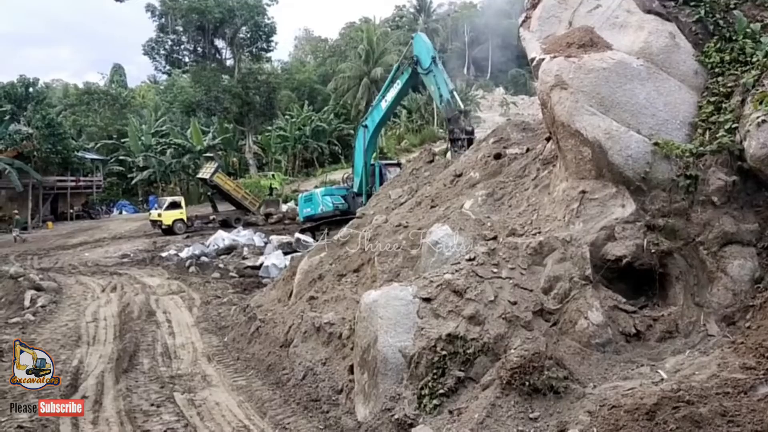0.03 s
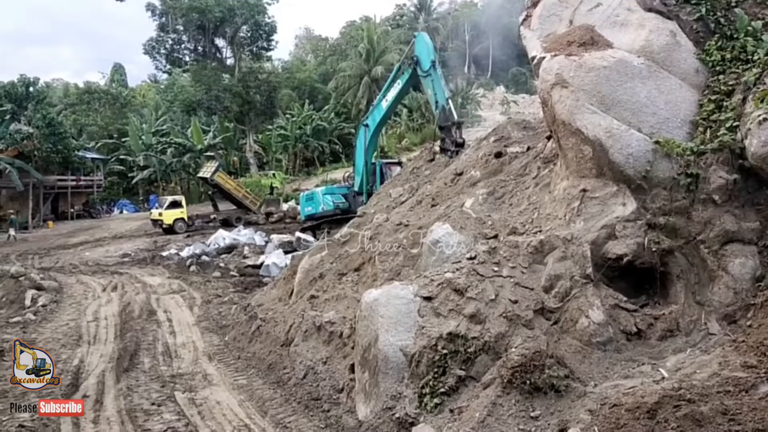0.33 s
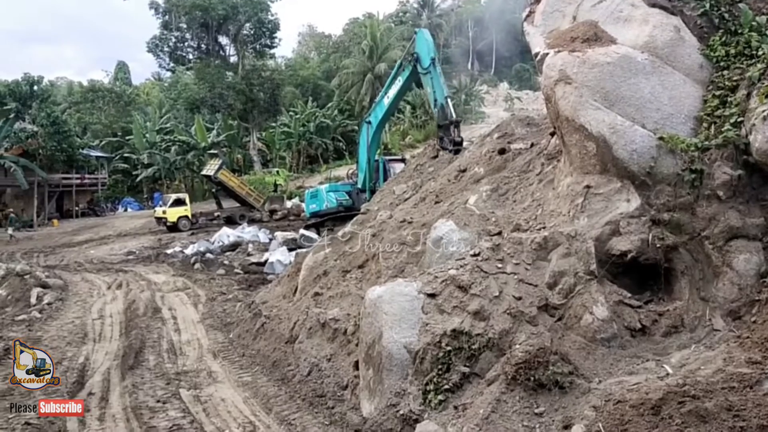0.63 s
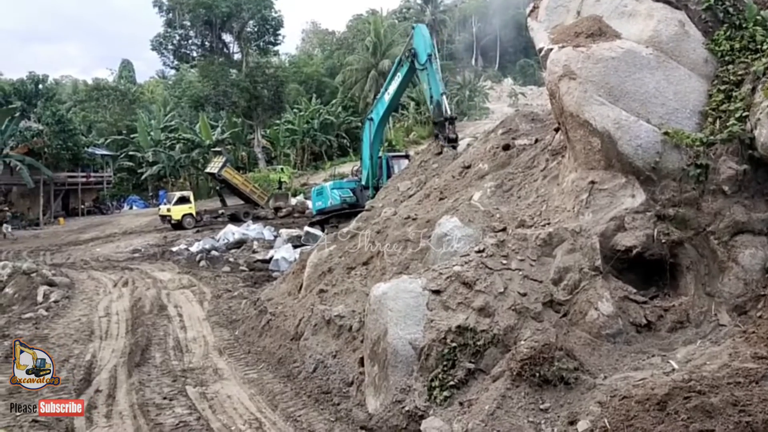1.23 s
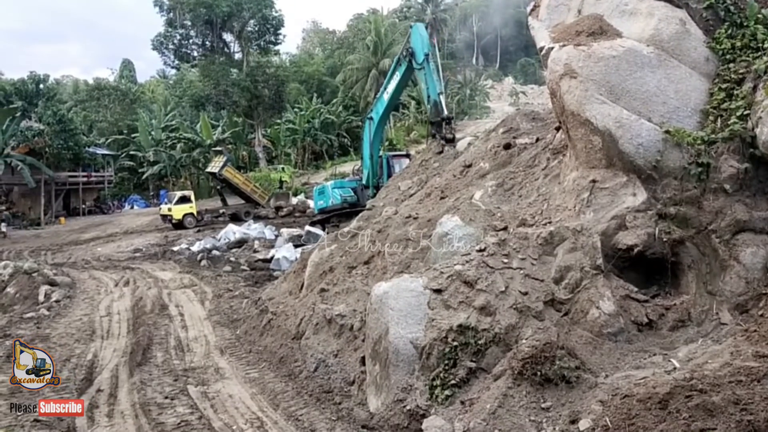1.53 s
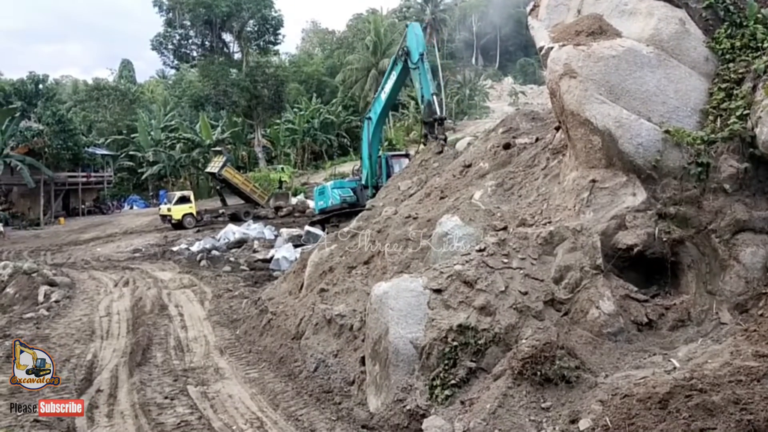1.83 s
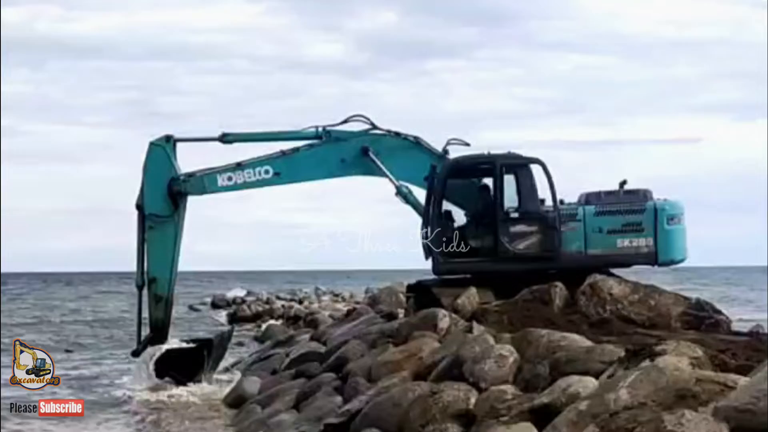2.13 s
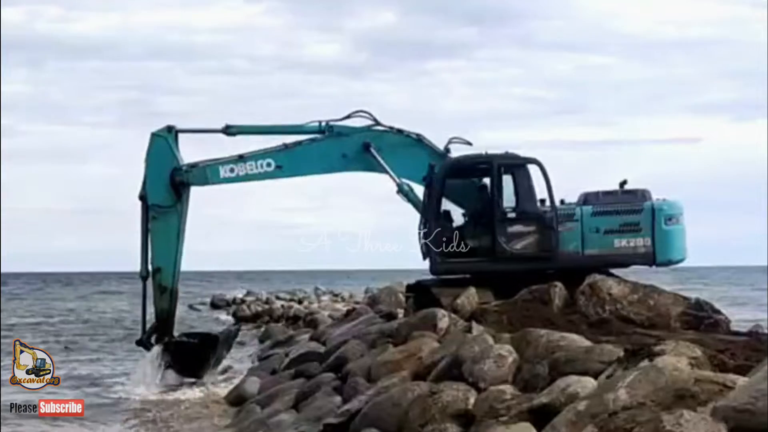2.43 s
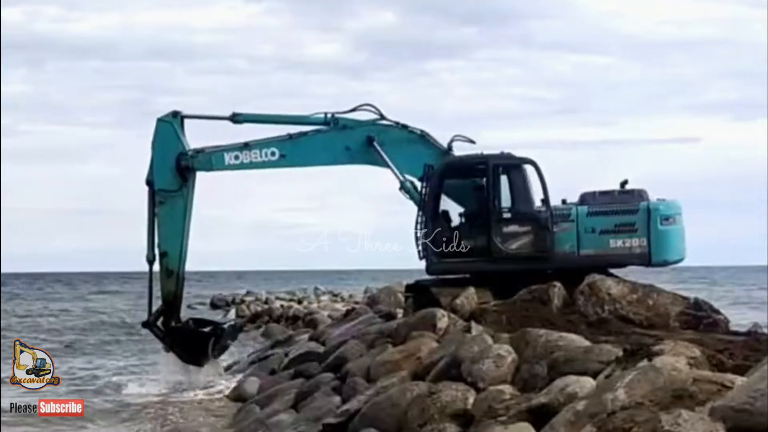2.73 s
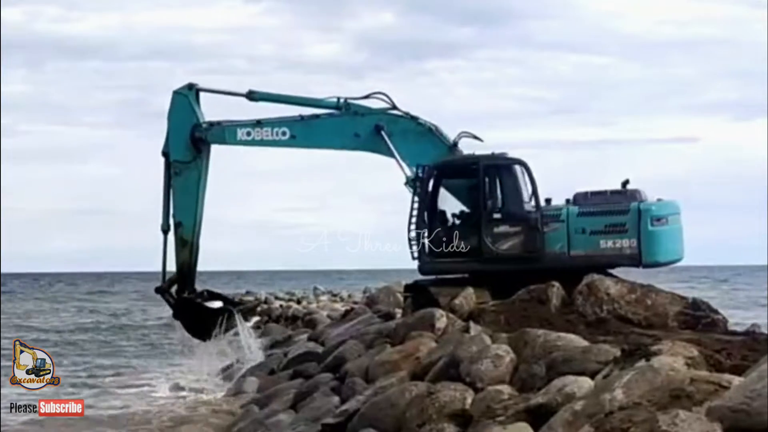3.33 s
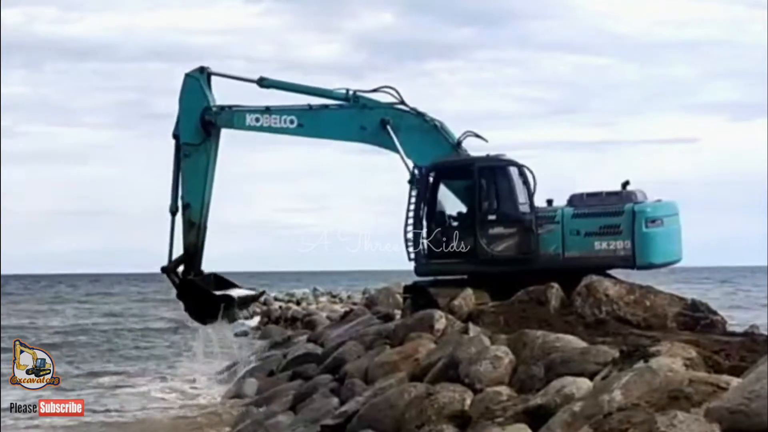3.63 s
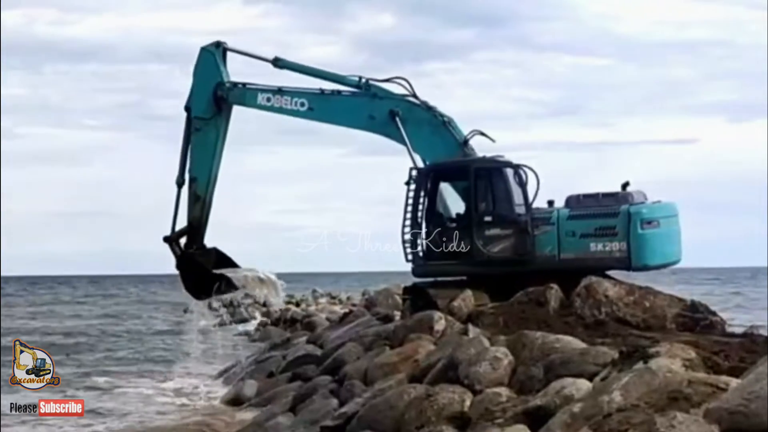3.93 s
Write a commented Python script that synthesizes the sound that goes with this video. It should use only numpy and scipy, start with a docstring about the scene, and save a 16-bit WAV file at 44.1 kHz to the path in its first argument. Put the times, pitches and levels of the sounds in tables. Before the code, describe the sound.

An excavator's steel bucket scrapes and knocks through rock across a quarry, its diesel running, ending on a heavy clang. After a brief silence, wind buffets the microphone by the sea as a wave washes over stones.

```python
"""Excavators in a quarry and on a sea wall

From across a quarry, a diesel runs while its steel bucket scrapes and knocks through rock, ringing
with each blow and ending on one heavy clang. After a short silence we stand at a sea wall, a second
machine murmuring far off: wind buffets the microphone, a wave washes over the stones and water
spills from the bucket."""
import sys
import numpy as np
from scipy import signal
from scipy.fft import rfft, irfft
from scipy.io import wavfile

SR = 44100
rng = np.random.default_rng(int(sys.argv[2]) if len(sys.argv) > 2 else 0)


def to_wav(s):
    """Save 16-bit WAV."""
    ch = np.atleast_2d(s).T  # columns
    pcm = np.round(np.clip(ch, -1, 1) * 32767)  # PCM
    wavfile.write(sys.argv[1], SR, pcm.astype(np.int16))


N = 176400
T, HZ = np.arange(N) / SR, np.fft.rfftfreq(N, 1 / SR)

# modes of the steel bucket and arm (frequency [Hz], relative level [dB], time to fall 60 dB [s])
BUCKET_MODES = [(133, 5.5, 0.13), (190.4, -2.5, 0.33), (233.7, -1.5, 0.54), (405.2, -4.5, 0.81),
                (489.7, -8.5, 0.9), (553.5, 0.5, .43), (713, -14, 0.47), (765, 1, .3), (845, 0, 0.5),
                (1068, 0, 0.3), (1222, -2.5, 0.25), (1398, -14, 1), (2660, -19.5, .35)]
# bucket against rock (time [s], relative level [dB], tone centre [Hz], half-width [octaves])
BLOWS = [(0.084, -30, 220, .6), (0.183, -37.5, 430, 0.38), (.286, -25, 1050, 1.3), (0.379, -34.5, 520, 1),
         (.461, -34.5, 850, .8), (.747, -30, 800, 0.99), (.76, -23.5, 1150, 0.55), (.797, -26.5, 750, 1.4),
         (0.82, -25.5, 1100, 1.7), (0.857, -27.5, 700, 2), (1.04, -46, 4400, 0.086),
         (1.057, -38.5, 1350, 0.36), (1.118, -35, 1100, 0.92), (1.333, -42, 520, 0.57),
         (1.543, -23.5, 119.7, 0.62), (1.533, -25, 700, 0.84), (1.565, -25, 490, .3),
         (1.733, -32.5, 450, 1.1), (1.866, -25, 550, 1.5), (1.917, -25, 330, 1), (2.063, -15, 240, .9)]
# rock being crushed (frequency [Hz], relative level [dB])
CRUNCH_TONE = [(40, -22.5), (200, 2.5), (290, -10.5), (450, -0.5), (880, 1.5), (1400, -3), (2500, -14),
               (16000, -29)]
# teeth bouncing on a boulder (time [s], level [dB])
BOULDER_BOUNCES = [(2.06, -20), (2.0665, -11), (2.077, -8), (2.088, -13.5), (2.1, -12.5)]
# bucket dragged through the ground (time [s], level [dB])
GRIND_LEVEL = [(0, -47), (.1, -38.5), (.35, -38.5), (.73, -44.5), (.88, -34.5), (.97, -41.5), (1.15, -40),
               (1.25, -46.5), (1.47, -47.5), (1.55, -29.5), (1.9, -32), (1.99, -36), (2.2, -33.5)]
# teeth grinding stones (frequency [Hz], relative level [dB])
GRIND_TONE = [(40, -44.5), (180, 0.5), (240, -11.5), (450, 2), (640, -5.5), (900, -1.5), (1600, -14.5),
              (2700, -20), (9000, -46)]
# sliding gravel (time [s], relative level [dB])
GRAVEL_LEVEL = [(0, -54.5), (.1, -49), (.75, -50), (.83, -43.5), (.96, -50.5), (1.13, -50), (1.25, -52),
                (1.49, -53.5), (1.56, -39.5), (1.64, -45), (1.78, -47.5), (1.87, -36), (2.03, -52),
                (2.065, -34.5), (2.2, -48)]
# gravel's rattle (frequency [Hz], relative level [dB])
RATTLE_TONE = [(300, -22.5), (1200, 4.5), (2650, 3), (3900, -4.5), (5800, -12), (7000, -6), (8500, -23),
               (16000, -27.5)]
# steel juddering over stone (start [s], stop [s], pitch [Hz], level [dB])
JUDDER_NOTES = [(0.22, 0.67, 860, -44.5), (0.292, 0.74, 1200, -45.5), (1.71, 1.982, 429.4, -33.5)]
# a hydraulic valve's squeal (frequency [Hz], relative level [dB])
SQUEAL_TONES = [(4330, 2), (9050, -4)]
# the squeal's two flares (time [s], relative level [dB])
SQUEAL_LEVEL = [(.05, -65), (.1, -54), (.18, -65), (.29, -59.5), (.4, -66), (.68, -65), (.9, -85)]
# the arm under load (time [s], pitch [Hz], level [dB])
ARM_GROAN = [(1.38, 66, -58), (1.5, 76, -39), (1.56, 94.5, -29), (1.64, 114, -41.5), (1.8, 122, -62)]
# the diesel's firing note (time [s], firing rate [Hz], level [dB])
FIRING = [(0, 61.93, -56), (1.35, 61.38, -68), (1.58, 63.44, -50), (1.74, 64.3, -41.5), (2, 57.2, -52.5),
          (2.2, 52, -53)]
# exhaust overtones (multiple of the firing rate [ratio], level [dB])
EXHAUST_ORDERS = [(2, -57.5), (3, -52)]
# turbocharger whistle (time [s], pitch [Hz], level [dB])
TURBO_WHISTLE = [(0, 13500, -56), (.25, 13050, -67), (.55, 11800, -74), (1.15, 12150, -70),
                 (1.45, 12560, -73), (2.2, 12470, -70)]
# diesel and fan across the quarry (frequency [Hz], relative level [dB])
CLATTER_TONE = [(30, -40.5), (68, -1.5), (120, 1.5), (190, -6), (290, 1.5), (480, -8.5), (1100, -13.5),
                (1500, -24), (2400, -13.5), (5600, -33.5), (7100, -16.5), (10000, -27)]
# the quarry's stereo width (frequency [Hz], left-right correlation [ratio])
QUARRY_CORRELATION = [(200, 0.98), (640, 0.83), (1410, 0.093), (3100, 0.056)]
# the quarry's lean to the left (frequency [Hz], left over right [dB])
QUARRY_PAN = [(1290, 0), (15000, 6.5)]

# gusts at the microphone (time [s], left level [dB], right level [dB])
GUSTS = [(2.52, -14.5, -20), (2.88, -20.5, -33), (2.96, -17, -22), (3.08, -18.5, -30.5), (3.85, -18.5, -25),
         (4, -22, -31.5)]
# wind on the left port (frequency [Hz], relative level [dB])
LEFT_WIND_TONE = [(42, -30.5), (70, -6), (160, 0), (300, -6), (480, -15.5), (1500, -53), (5000, -56)]
# wind on the right port (frequency [Hz], relative level [dB])
RIGHT_WIND_TONE = [(42, -30), (68, -1.5), (115, 7), (190, -2), (450, -20), (1500, -28.5), (5000, -70)]
# sharp buffets on the left port (time [s], level [dB])
BUFFET_HITS = [(3.351, -14), (3.442, -19), (3.542, -23), (3.589, -16), (3.884, -14)]
# a buffet's thump (frequency [Hz], relative level [dB])
THUMP_TONE = [(40, -34), (450, 13.5), (800, 4), (1500, -20), (16000, -73)]
# wave washing over the stones (time [s], level [dB])
WASH_LEVEL = [(2.52, -19.5), (2.62, -32.5), (2.8, -30.5), (2.95, -34.5), (3.1, -38), (3.4, -43.5),
              (4, -43.5)]
# the wave's fizz (frequency [Hz], relative level [dB])
WASH_TONE = [(100, -21), (400, -2), (900, 3.5), (1500, -3), (2400, -1.5), (2950, -7), (5700, -11.5),
             (7100, -5), (8500, -13.5), (11500, -20)]
# spilled water slapping the sea (frequency [Hz], relative level [dB])
SLAP_TONE = [(200, -13), (1300, 23), (4500, 17), (8000, -12)]
# open sea and far engine (frequency [Hz], relative level [dB])
MURMUR_TONE = [(40, -7), (450, 7), (1100, -6), (2400, -10), (3000, -19), (5700, -27), (7100, -12),
               (8600, -19), (15500, -33)]
# the shore's stereo width (frequency [Hz], left-right correlation [ratio])
SHORE_CORRELATION = [(650, 0.6), (1400, 0.015)]
# the shore's lean to the left (frequency [Hz], left over right [dB])
SHORE_PAN = [(2200, 1.1), (5600, 5.6), (7000, 3.9), (15000, 5.5)]


def knocks(rise_s=0.007, decay_s=0.041, ring_db=1, echo_db=-9, echo_decay_s=0.05):
    """Each blow crushes rock and rings the bucket; echo off the slope fills out the crunch's tail."""
    out, t = np.zeros((2, N)), np.arange(SR // 2) / SR
    hz = np.fft.rfftfreq(len(t), 1 / SR)
    clumps = np.exp(0.26 * np.clip(drift(300), -2, 2))
    rise = np.minimum(t / rise_s, 1)
    fall = np.exp(-np.maximum(t - rise_s, 0) / decay_s) + amp(echo_db) * np.exp(-t / echo_decay_s)
    for start, db, centre_hz, octaves in BLOWS:
        span = slice(round(start * SR), round(start * SR) + len(t))
        chips = rfft(rng.standard_normal((2, len(t))) * clumps[span])
        crunch = irfft(chips * amp(read(CRUNCH_TONE, hz)) * bell(hz, centre_hz, octaves), len(t)) * fall
        crunch *= np.linalg.norm(fall) / np.linalg.norm(crunch, axis=1, keepdims=True)
        steel = amp(ring_db) * bucket_ring(t, lambda f: bell(f, centre_hz, octaves))
        out[:, span] += amp(db) * rise * (crunch + steel) / 2
    return out


def bucket_ring(t, weight):
    """The bucket's dying modes, each weighted by the blow."""
    hz, db, t60 = np.transpose(BUCKET_MODES)[:, :, None]
    gains = amp(db) * weight(hz)
    modes = np.sin(2 * np.pi * (hz * t + rng.random((2, len(hz), 1))))
    return (modes * gains * amp(-60 * t / t60)).sum(1) / np.sqrt(np.sum(gains ** 2) / 2)


def clang(rise_s=0.00092, decay_s=0.0065):
    """Each bounce rings the bucket; the boulder it is pressed against damps it at once."""
    out, t = np.zeros(N), np.arange(SR // 8) / SR
    hz, db, _ = np.transpose(BUCKET_MODES)[:, :, None]
    gains = amp(db) * bell(hz, centre_hz=800, octaves=0.26)
    strike = (gains * np.sin(2 * np.pi * hz * t)).sum(0) / np.linalg.norm(gains)
    strike *= np.minimum(t / rise_s, 1) * np.exp(-t / decay_s)
    for start, level_db in BOULDER_BOUNCES:
        out[round(start * SR):][:len(t)] += amp(level_db) * strike
    return out


def scrape(hum_db=-9):
    """Teeth grind through stones and keep the bucket humming."""
    grind = grains(GRIND_TONE, rough=0.3, clump_hz=90) * amp(curve(GRIND_LEVEL))
    hum = signal.fftconvolve(grind, bucket_ring(T[:SR // 3], np.ones_like), axes=1)[:, :N]
    return grind + amp(hum_db) * grind.std() * unit(hum)


def gravel(plate_decay_s=0.0091, gain_db=2):
    """Sliding gravel rattles over the bucket's plates, which ring briefly."""
    plates = rng.standard_normal((2, N)) * np.exp(-T / plate_decay_s)
    pebbles = grains(RATTLE_TONE, rough=0.2, clump_hz=150)
    rattle = unit(irfft(rfft(pebbles) * rfft(plates), N))
    return rattle * amp(gain_db + curve(GRAVEL_LEVEL))


def judder():
    """The teeth stick and slip, holding one unsteady note of the bucket for a moment."""
    out = np.zeros(N)
    for start, stop, hz, db in JUDDER_NOTES:
        arch = np.sqrt(np.maximum((T - start) * (stop - T), 0)) * 2 / (stop - start)
        note = sine(hz, waver=0.04, waver_hz=145)
        flicker = np.exp(0.47 * drift(41))
        out += amp(db) * note * flicker * arch
    return out


def groan(overtone_db=-8.5):
    """The arm gives a low rising groan as it takes the load."""
    hz = curve(ARM_GROAN)
    note = sine(hz, waver=0.04, waver_hz=30)
    overtone = amp(overtone_db) * sine(2 * hz, waver=0.042, waver_hz=30)
    loaded = (T > ARM_GROAN[0][0]) & (T < ARM_GROAN[-1][0])
    return (note + overtone) * amp(curve(ARM_GROAN, column=2)) * loaded


def valve_squeal():
    """A hydraulic valve gives a thin, fitful squeal."""
    partials = sum(amp(db) * sine(hz, waver=0.014, waver_hz=400) for hz, db in SQUEAL_TONES)
    flicker = np.exp(0.25 * drift(12))
    return partials * amp(curve(SQUEAL_LEVEL)) * flicker


def exhaust(waver=0.042, flutter=0.77):
    """The diesel's firing note swells and sags under load, with fluttering overtones."""
    firing_hz = curve(FIRING)
    overtones = sum(amp(db) * sine(order * firing_hz, waver, waver_hz=20) * (1 + flutter * drift(18))
                    for order, db in EXHAUST_ORDERS)
    return amp(curve(FIRING, column=2)) * sine(firing_hz, waver, waver_hz=25) + overtones


def turbo():
    """The turbocharger's faint whistle sags and partly recovers."""
    return amp(curve(TURBO_WHISTLE, column=2)) * sine(curve(TURBO_WHISTLE), waver=0.014, waver_hz=300)


def clatter(level_db=-47.5):
    """Steady mechanical noise of the diesel and its fan, from across the quarry."""
    return amp(level_db) * colour(rng.standard_normal((2, N)), CLATTER_TONE)


def wind(rough=0.29, eddy_hz=38.4, buffet_rise_s=0.002, buffet_decay_s=0.0072):
    """Eddies thump each microphone port separately; sharp buffets catch the left one."""
    left = grains(LEFT_WIND_TONE, rough, eddy_hz, channels=1)[0] * amp(curve(GUSTS))
    right = grains(RIGHT_WIND_TONE, rough, eddy_hz, channels=1)[0] * amp(curve(GUSTS, column=2))
    buffets = sum(amp(db) * ramp(T - start, buffet_rise_s) * np.exp(-abs(T - start) / buffet_decay_s)
                  for start, db in BUFFET_HITS)
    left += buffets * colour(rng.standard_normal(N), THUMP_TONE)
    return np.array([left, right])


def wave():
    """A wave washes over the stones and fizzes out."""
    return grains(WASH_TONE, rough=0.084, clump_hz=252) * amp(curve(WASH_LEVEL))


def spill(at_s=3.974, half_width_s=0.01, level_db=-37):
    """Water from the bucket slaps the sea once."""
    slap = np.exp(-((T - at_s) / half_width_s) ** 2)
    return grains(SLAP_TONE, rough=0.26, clump_hz=400) * amp(level_db) * slap


def sea(level_db=-39):
    """The open sea and the far engine blend into a steady murmur."""
    return grains(MURMUR_TONE, rough=0.15, clump_hz=49.5) * amp(level_db)


def amp(db):
    """Decibels to gain."""
    return 10 ** (np.asarray(db) / 20)


def unit(x):
    """Scales to rms 1."""
    return x / np.sqrt(np.mean(x ** 2) + 1e-20)


def ramp(t, length_s):
    """A straight fade from 0 to 1."""
    return np.clip(t / length_s, 0, 1)


def read(points, hz=HZ):
    """Reads a table along log frequency."""
    f, value = np.transpose(points)
    return np.interp(np.log(hz + 1), np.log(f), value)


def curve(rows, column=1):
    """Reads one column of a table along time."""
    rows = np.array(rows)
    return np.interp(T, rows[:, 0], rows[:, column])


def colour(x, tone):
    """Gives a sound a spectrum, at rms 1."""
    return unit(irfft(rfft(x) * amp(read(tone)), N))


def bell(hz, centre_hz, octaves):
    """Which frequencies a blow favours."""
    return 1 / np.sqrt(1 + (np.log2((hz + 1) / centre_hz) / octaves) ** 4)


def drift(rate_hz):
    """Random wandering up to a rate, at rms 1."""
    return unit(irfft(rfft(rng.standard_normal(N)) / (1 + (HZ / rate_hz) ** 4) * (HZ > 0), N))


def grains(tone, rough, clump_hz, channels=2):
    """Noise that comes in clumps, like countless tiny impacts."""
    noise = rng.standard_normal((channels, N))
    clumps = np.exp(rough * np.clip(drift(clump_hz), -2.3, 2.3))
    return colour(noise * clumps, tone)


def sine(hz, waver, waver_hz):
    """A tone of rms 1 whose pitch wanders by the fraction `waver`."""
    cycles = np.cumsum(hz * (1 + waver * drift(waver_hz))) / SR
    return np.sqrt(2) * np.sin(2 * np.pi * (cycles + rng.random()))


def spread(pair, correlation, pan):
    """Turns two unrelated signals into left and right, as a mid-side pair."""
    a, b = rfft(pair)
    same = np.clip(read(correlation), -1, 1)
    mid, side = a * np.sqrt((1 + same) / 2), b * np.sqrt((1 - same) / 2)
    gains = amp(np.outer([1 / 2, -1 / 2], read(pan)))
    return irfft(np.array([mid + side, mid - side]) * gains, N)


def scene(quarry_end_s=2.207, shore_start_s=2.52):
    """Two microphone positions: the quarry, then after a silence the sea wall."""
    whistles = np.array([valve_squeal() + turbo() for _ in range(2)])
    work = knocks() + scrape() + gravel() + clatter() + whistles
    centre = clang() + judder() + exhaust() + groan()
    quarry = spread(work, QUARRY_CORRELATION, QUARRY_PAN) + centre
    shore = spread(wave() + sea() + spill(), SHORE_CORRELATION, SHORE_PAN) + wind()
    fade_out = ramp(quarry_end_s - T, length_s=0.0041)
    fade_in = ramp(T - shore_start_s, length_s=0.099) ** 1.29
    return quarry * fade_out + shore * fade_in


def record(dry):
    """The recorder passes nothing much above 15.8 kHz."""
    lowpass = signal.firwin(511, 15800, window=("kaiser", 9), fs=SR)
    return signal.oaconvolve(dry, lowpass[None], "same")


dry = scene()
out = record(dry)
to_wav(out)
```